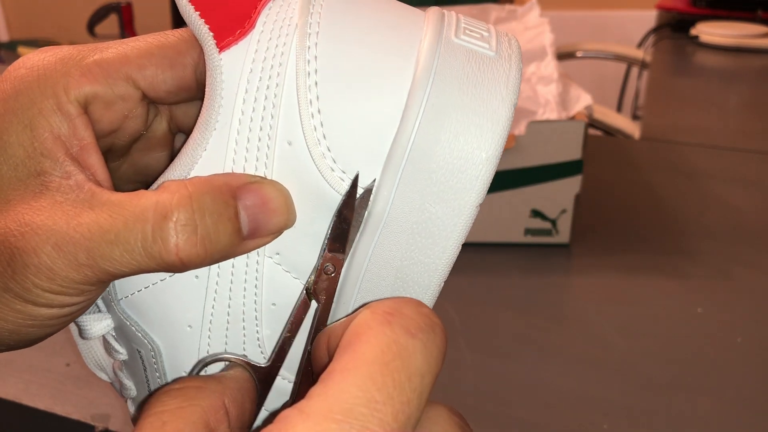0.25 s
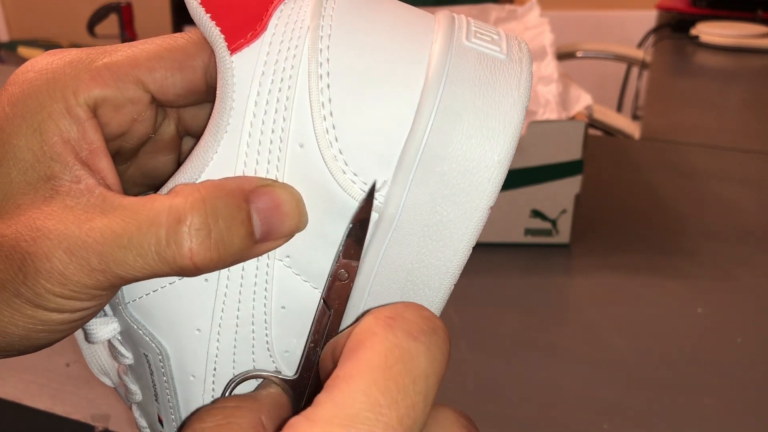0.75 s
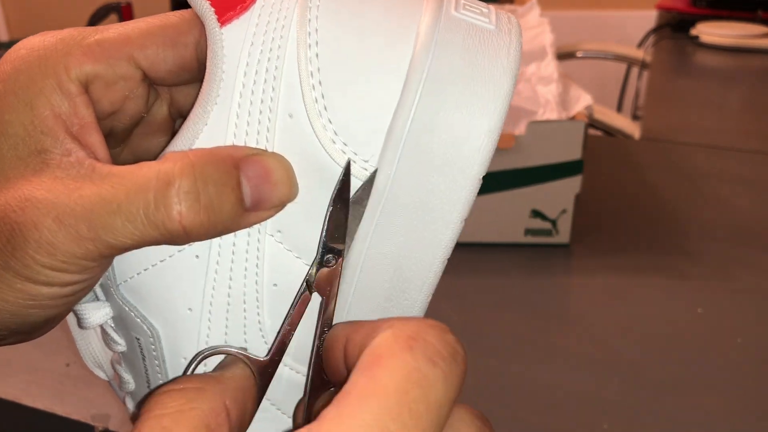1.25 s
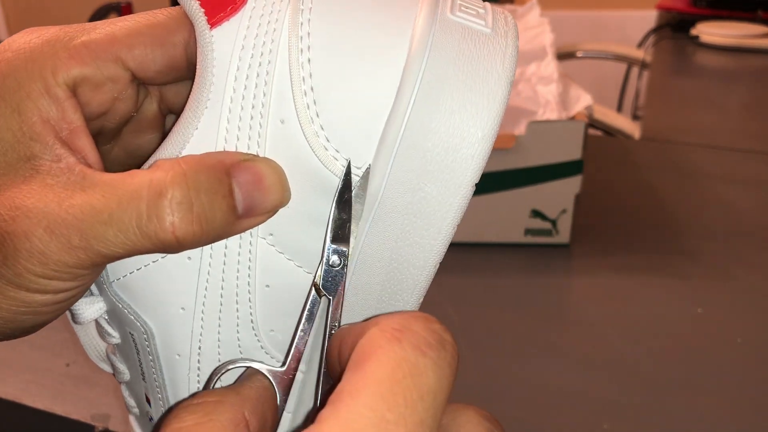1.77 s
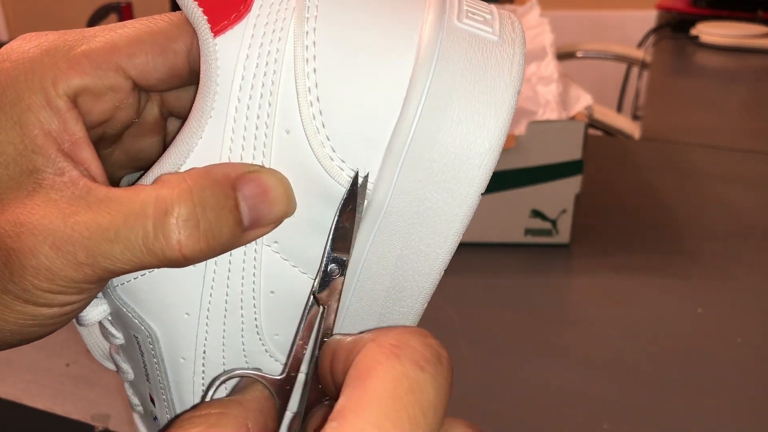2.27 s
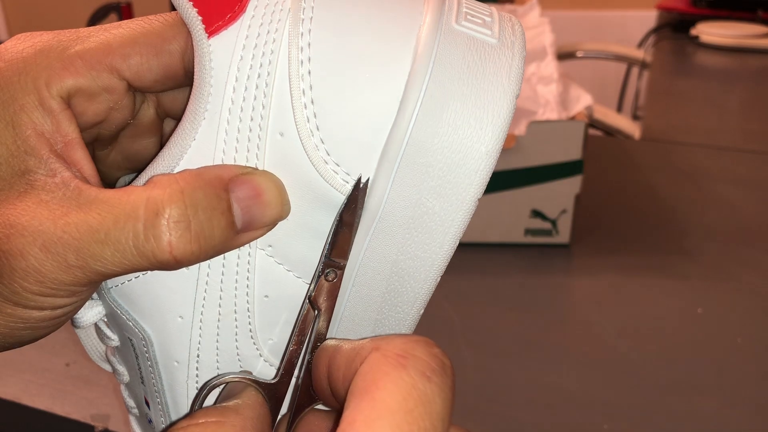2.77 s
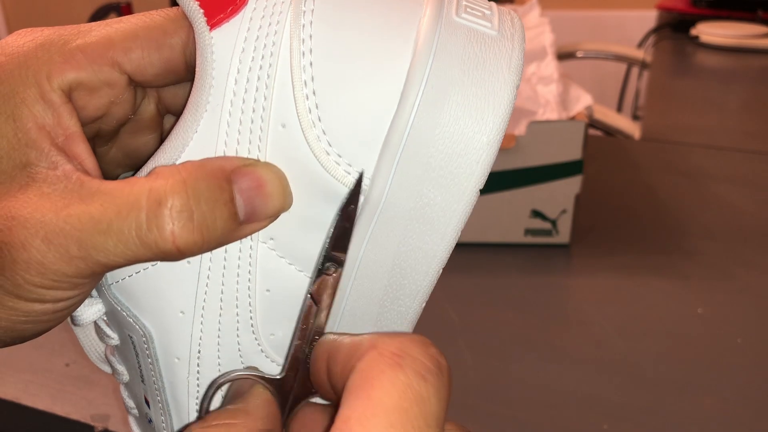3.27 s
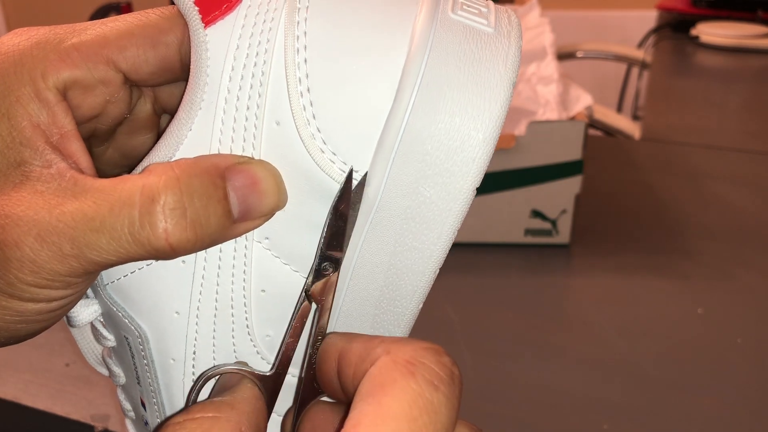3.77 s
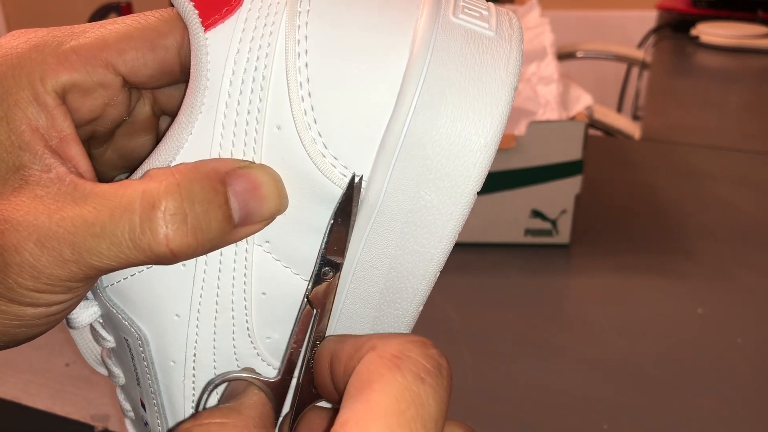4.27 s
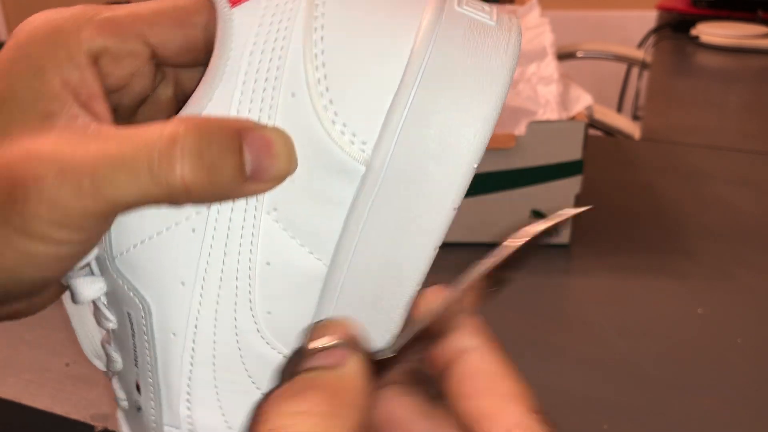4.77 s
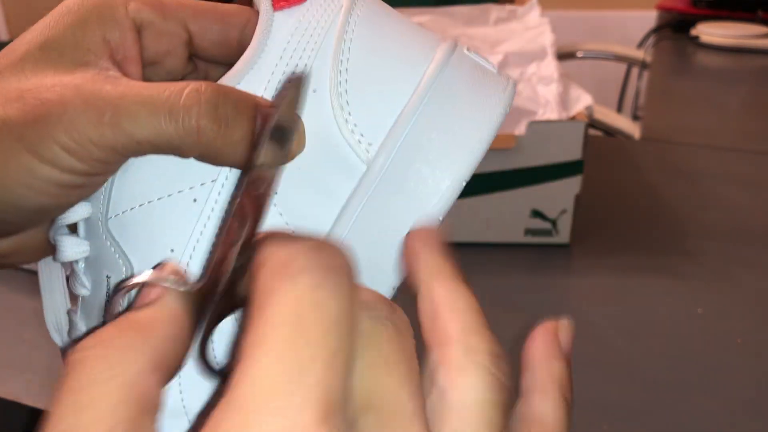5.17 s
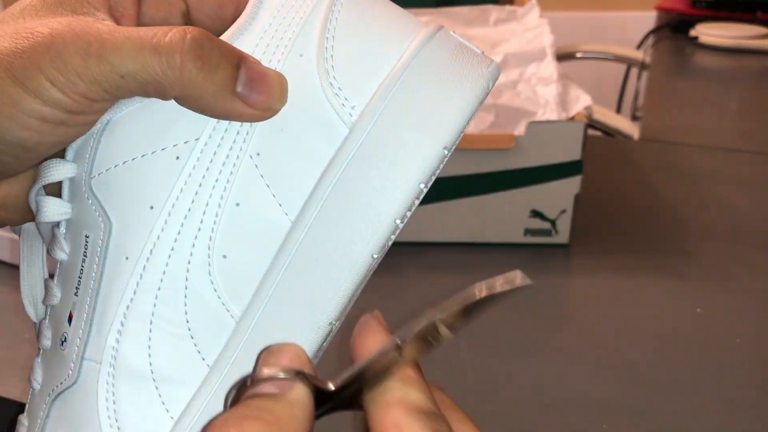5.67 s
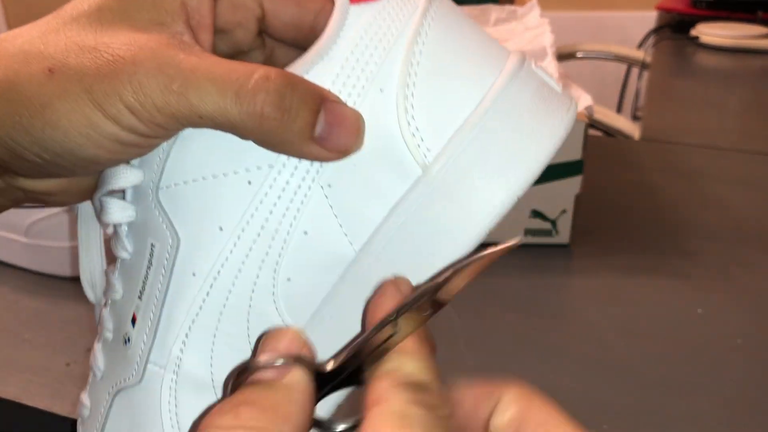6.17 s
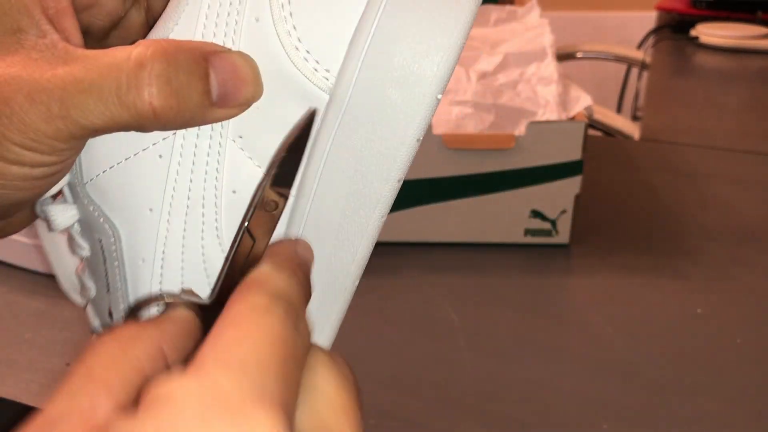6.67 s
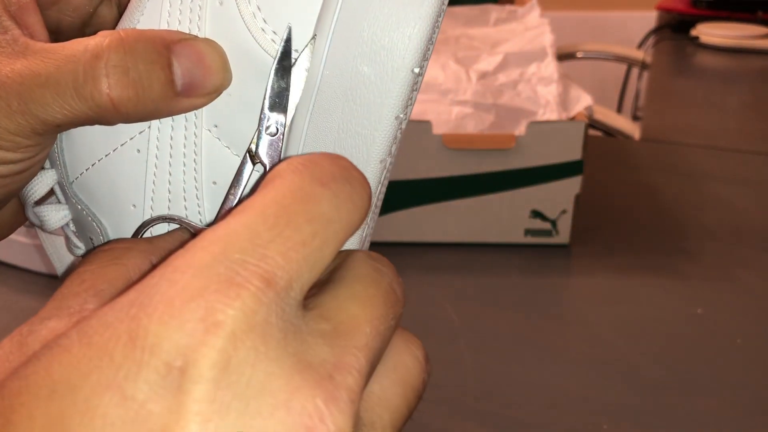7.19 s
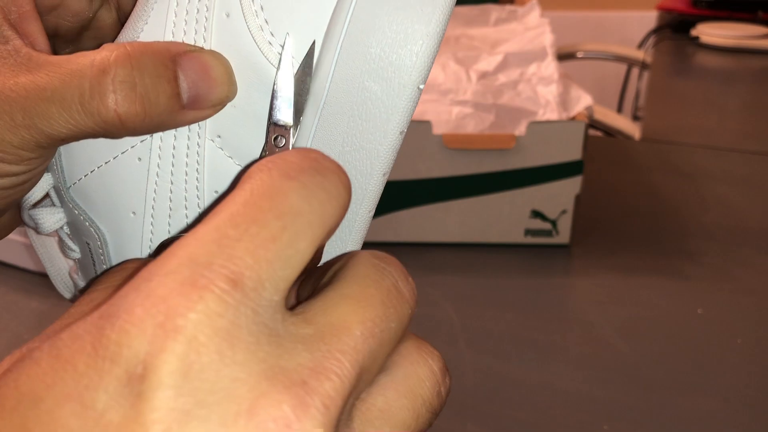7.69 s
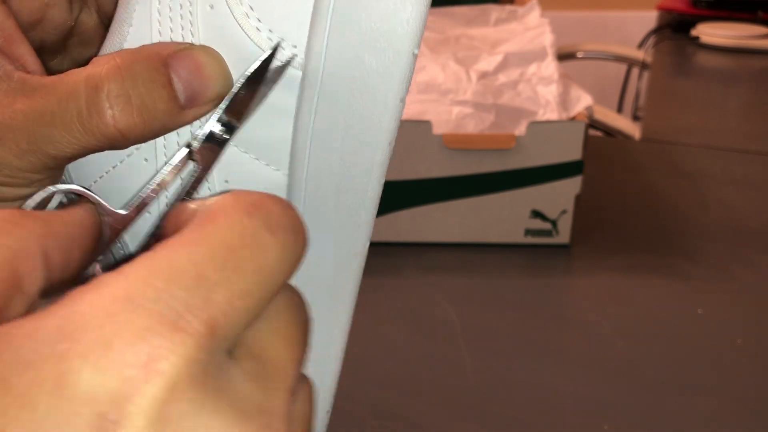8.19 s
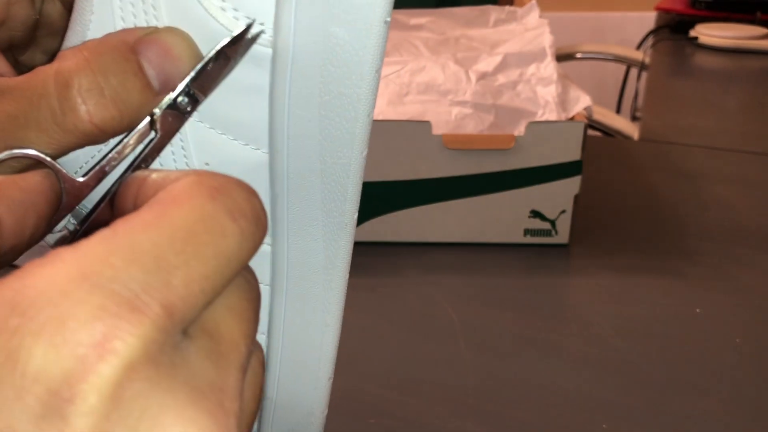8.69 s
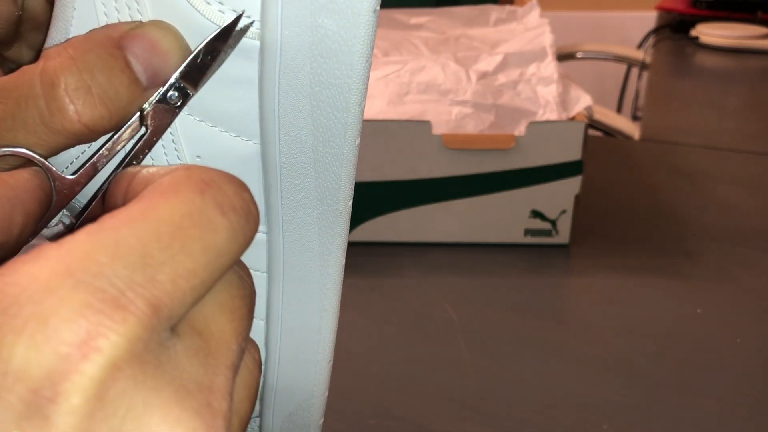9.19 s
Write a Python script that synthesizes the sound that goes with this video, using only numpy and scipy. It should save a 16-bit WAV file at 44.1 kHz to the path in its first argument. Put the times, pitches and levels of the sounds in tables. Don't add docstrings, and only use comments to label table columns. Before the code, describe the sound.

A quiet indoor room with low fan hum, air rumble and light microphone hiss. Close up, three isolated dry scissor snips come widely spaced in the first half. Then quick finger scrapes, soft taps on the shoe, faint cloth rustles and small metallic ticks cluster together, thinning to sparse dull bumps while a deep compressor hum rises and stays. Short, faint reflections follow the contacts.

```python
import sys
import numpy as np
from scipy import signal
from scipy.fft import rfft, irfft
from scipy.io import wavfile

SR = 44100
rng = np.random.default_rng(int(sys.argv[2]) if len(sys.argv) > 2 else 0)


def put_to_file(sound):
    columns = np.atleast_2d(sound).T
    safe = np.clip(columns, -1, 1)
    whole_steps = np.round(safe * 32767)
    wavfile.write(sys.argv[1], SR, whole_steps.astype(np.int16))


def undo_db(level):
    steps = np.asarray(level, float) / 20
    return 10 ** steps


N = 416304

# start_s, level_db (6 ms rms at 4 kHz), hardness_db_per_oct, focus_db_per_oct2
SNIPS = [
    (0.7234, -39.8, 3.4, -0.3),
    (3.158, -37.8, 0.8, 1.7),
    (4.4668, -42.7, 0.8, 1.8),
]
# start_s, level_db (at 4 kHz), hardness_db_per_oct, focus_db_per_oct2
KNOCKS = [
    (6.2594, -53.1, -1.9, 1.9),
    (6.2843, -50.1, 5.9, 0.2),
]
# mode_hz, level_db (over the band), t60_s
GRIPPED_MODES = [(1880, 3, .014), (2460, 3, .02), (8900, -2, .013), (14100, -1, .009)]
# mode_hz, level_db (over the band), t60_s
FREE_MODES = [(2450, 18, .009), (6379, 8, .034), (8791, 5, .022), (8952, 9, .024), (9345, 10, .02),
              (11360, -3, .018)]


def scissors():
    snips, knocks = contacts(SNIPS, column=1), contacts(KNOCKS, column=1)
    out = undo_db(-.3) * cracks(snips, trail_db=-15, trail_t60_s=.03, shear_db=-22)
    out += struck(snips, GRIPPED_MODES)
    out += cracks(knocks, trail_db=-3, trail_t60_s=.018, shear_db=-40)
    out += struck(knocks[1:], FREE_MODES)
    return out + rattle() + ticks()


# mode_hz, level_db, t60_s
RATTLE_MODES = [(2570, -0.5, 0.0079), (2920, 0, 0.0066), (5060, -5, 0.0055), (7400, 3.5, 0.0033),
                (8140, 3.5, .003), (11400, -25, 0.0071)]


def rattle():
    start_s, length_s, level_db = 6.0405, 0.0045, -54.5
    t = np.arange(N) / SR - start_s
    force = rng.standard_normal(N) * (t > 0) * (t < length_s) * undo_db(level_db)
    ringing = sum(undo_db(mode_db) * ring(force, hz, t60_s) for hz, mode_db, t60_s in RATTLE_MODES)
    return ringing + 1.3 * band(force, 2000, 14000)


# start_s, peak_db, mode_hz, t60_s
TICKS = [(.694, -58, 1940, .03), (4.8615, -53, 11700, .035), (4.862, -53, 9500, .025),
         (5.141, -35, 2600, 0.0084), (7.0035, -53, 2600, .007), (6.7766, -42.5, 2340, 0.0072),
         (7.1338, -45, 2160, 0.0075), (7.1605, -40.5, 520, 0.017), (7.947, -47, 584, 0.038),
         (8.226, -48, 2220, 0.0084), (8.658, -60, 1500, 0.018)]


def ticks():
    out = np.zeros(N)
    blow = np.zeros(4096)
    blow[0] = 1
    for start_s, peak_db, hz, t60_s in TICKS:
        swelling = ring(ring(blow, hz, t60_s), hz, t60_s / 4)
        out[round(start_s * SR):][:4096] += swelling * undo_db(peak_db) / np.abs(swelling).max()
    return out


# start_s, level_db (at 4 kHz), hardness_db_per_oct, focus_db_per_oct2
TAPS = [(4.8608, -56.6, -0.1, 2.1), (4.999, -69.4, 0.0, 0.3), (5.059, -62.4, -3.3, 2.6),
        (5.0699, -50.5, -2.9, 0.9), (5.3731, -52.4, -3.7, 0.5), (5.5981, -69.7, -4.7, 1.7),
        (5.6029, -68.7, -4.6, 2.1), (5.6563, -65.7, -5.4, 2.9), (5.6642, -56.4, -8.6, 4.2),
        (5.983, -53.6, -2.3, 0.2), (5.9939, -63.3, -6.1, 1.5), (6.359, -67.8, -4.7, 2.1),
        (6.5243, -60.6, -5.5, 2.2), (6.5557, -64.9, 0.2, 0.6), (6.6998, -63.8, -1.9, 1.6),
        (7.0031, -65.0, -6.8, 2.0), (6.7761, -65.1, -6.1, 2.6), (7.1338, -64.2, -6.3, 3.3),
        (7.161, -77.9, -5.8, -1.4), (8.226, -64.7, -5.7, 2.2)]


def taps():
    return cracks(contacts(TAPS, column=2), trail_db=-20, trail_t60_s=.025, shear_db=-45)


# touch_s, hardest_s, lift_s, scrape_db, bright_db
SWIPES = [
    (5.082, 5.111, 5.134, -58, -51.5),
    (5.104, 5.138, 5.146, -44, -48.5),
    (5.388, 5.427, 5.46, -47, -47),
    (5.998, 6.036, 6.042, -45, -48),
]


def swipes():
    strokes = strokes_of(SWIPES, low_db=-2, swing_db=[9, 18, 24], bend=[1.3, 1.3, 1.2])
    return friction(strokes, slips_per_s=8500, spread_db=3.0, tilt=.6)


# touch_s, hardest_s, lift_s, dull_db, bright_db
RUSTLES = [(2.29, 2.32, 2.35, -68, -75), (2.64, 2.68, 2.72, -72, -79), (3.128, 3.142, 3.156, -61, -67),
           (4.858, 4.862, 4.878, -64, -60), (4.865, 4.88, 4.93, -71, -69), (5.14, 5.16, 5.26, -66, -71),
           (5.45, 5.47, 5.64, -68, -70), (6.045, 6.08, 6.22, -63, -67), (6.45, 6.515, 6.545, -60, -66),
           (6.55, 6.61, 6.65, -72, -67), (6.68, 6.705, 6.76, -69, -68), (7.91, 7.935, 7.99, -72, -74)]


def rustles():
    strokes = strokes_of(RUSTLES, low_db=4, swing_db=[16.5, 11, 13], bend=[1.1, 0.92, 1.1])
    return friction(strokes, slips_per_s=4600, spread_db=2.5, tilt=0.66)


def strokes_of(rows, low_db, swing_db, bend):
    off = np.linspace(-1, 1, num=17)[:, None]
    loss_db = np.array(swing_db) * np.abs(off) ** np.where(off < 0, bend, 1.8)
    strokes = []
    for touch_s, hardest_s, lift_s, dull_db, bright_db in rows:
        times_s = np.interp(off, [-1, 0, 1], [touch_s, hardest_s, lift_s])
        levels_db = np.array([dull_db + low_db, dull_db, bright_db]) - loss_db
        strokes.append(np.c_[times_s, levels_db])
    return strokes


def friction(strokes, slips_per_s, spread_db, tilt):
    sizes = undo_db(spread_db * np.minimum(rng.exponential(1, N), 4)) * rng.choice([-1, 1], N)
    slips = sizes * (rng.random(N) < slips_per_s / SR)
    low = band(slips, 140, 1060) + 0.012 * ring(slips, 1050, 0.014)
    dull = band(slips, 1400, 3640) + .03 * ring(slips, 2540, 0.0087)
    bright = band(signal.lfilter([1], [1, -tilt], slips), 4600, 15000)
    bright = signal.sosfilt(signal.cheby2(10, 60, 16900, fs=SR, output="sos"), bright)
    parts = [rms_one(part) for part in (low, dull, bright)]
    out, t = np.zeros(N), np.arange(N) / SR
    for times_s, *levels_db in map(np.transpose, strokes):
        span = slice(round(times_s[0] * SR), round(times_s[-1] * SR))
        for level_db, part in zip(levels_db, parts):
            out[span] += undo_db(np.interp(t[span], times_s, level_db)) * part[span]
    return out


# band_hz, steel_db, leather_db, crack_t60_s
BODY = [(740, -2.4, -2.7, .02), (2000, -3.8, -3.8, .011), (3500, -5, -3.2, .006), (4800, -3, -3, .006),
        (6000, -1.5, -4.5, .005), (9700, -3.5, -4.5, .005), (11700, -3, -3, .0045),
        (15000, -7.5, -6, .0045)]


def body(column):
    edges, table = np.array(BAND_EDGES_HZ), np.array(BODY)
    middles = np.log2(np.sqrt(edges[1:] * edges[:-1]))
    return np.interp(middles, np.log2(table[:, 0]), table[:, column]), middles - np.log2(4000)


def contacts(rows, column):
    body_db, octaves = body(column)
    rows = np.array(rows)
    start_s, level_db, hardness, focus = (rows[:, i:i + 1] for i in range(4))
    return np.c_[start_s, level_db + hardness * octaves - focus * octaves ** 2 + body_db]


BAND_EDGES_HZ = [420, 740, 1300, 2000, 3000, 4100, 5500, 6500, 7600, 9000, 10500, 13000, 16000]


def cracks(rows, trail_db, trail_t60_s, shear_db):
    lead, out, rows = 160, np.zeros(N), np.array(rows)
    t = (np.arange(2048) - lead) / SR
    after = np.maximum(t, 0)
    grit = rng.standard_normal((len(rows), len(t)))
    grit[:, lead + 4] = 5.5
    crack_t60_s = body(column=3)[0]
    for k, (low_hz, high_hz) in enumerate(zip(BAND_EDGES_HZ, BAND_EDGES_HZ[1:])):
        dying = undo_db(-60 * after / crack_t60_s[k]) + undo_db(trail_db - 60 * after / trail_t60_s)
        envelope = np.where(t < 0, undo_db(shear_db + 3000 * t), dying)
        split, overlap_db = (band, 0) if low_hz < 3000 else (in_step, 2.7)
        bursts = split(grit * envelope, low_hz, high_hz)
        power = np.mean(bursts[:, lead - 20:lead + 245] ** 2, axis=1, keepdims=True)
        bursts = bursts * undo_db(rows[:, k + 1:k + 2] - overlap_db) / np.sqrt(power)
        for start_s, burst in zip(rows[:, 0], bursts):
            out[round(start_s * SR) - lead:][:len(t)] += burst
    return out


def struck(rows, modes):
    out, rows = np.zeros(N), np.array(rows)
    for hz, mode_db, t60_s in modes:
        blows = np.zeros(N)
        band_db = rows[:, np.searchsorted(BAND_EDGES_HZ, hz)]
        blows[(rows[:, 0] * SR).astype(int)] = undo_db(band_db + mode_db + 3)
        out += ring(blows, hz, t60_s)
    return out


def ring(force, hz, t60_s):
    r, w = undo_db(-60 / (t60_s * SR)), 2 * np.pi * hz / SR
    return signal.lfilter([0, np.sin(w)], [1, -2 * r * np.cos(w), r * r], force + 1e-18)


def band(x, low_hz, high_hz):
    return signal.sosfilt(signal.butter(3, [low_hz, high_hz], "band", fs=SR, output="sos"), x + 1e-18)


def in_step(x, low_hz, high_hz):
    return signal.sosfiltfilt(signal.butter(2, [low_hz, high_hz], "band", fs=SR, output="sos"), x + 1e-18)


def rms_one(x):
    return x / np.sqrt(np.mean(x ** 2) + 1e-20)


def room(x):
    t60_s, level_db, gap_s = 0.24, -19, 0.0044
    top_hz, top_t60_s, top_db = 8500, .14, -2
    t = np.arange(SR // 2) / SR
    white = rng.standard_normal(len(t))
    tail = band(white, 400, top_hz) * undo_db(-60 * t / t60_s)
    tail += band(white, top_hz, 15500) * undo_db(top_db - 60 * t / top_t60_s)
    tail *= t > gap_s
    return undo_db(level_db) * signal.fftconvolve(x, tail / np.sqrt(np.sum(tail ** 2)))[:N]


FAN_ORDERS = [1, 3, 4, 5, 7, 9, 10]
FAN_ORDERS_DB = [-80, -59.5, -58, -67.5, -65.5, -73.5, -74.5]
# time_s, loss_db
SHADE = [(0, 3), (.3, 0.5), (2.1, -1), (3.6, 1.5), (4.6, 9), (5.4, 5.5), (5.85, 0), (9.44, 1)]


def fan():
    t = np.arange(N) / SR
    shaft = 2 * np.pi * 162.33 / 6 * t
    loss_db = np.interp(t, *np.transpose(SHADE))
    flutter_db = (0.85 + 0.62 * np.maximum(loss_db, 0)) * drift(rate_hz=11)
    out = tone(6 * shaft, -51.5 - loss_db + np.minimum(flutter_db, loss_db + 2), wander_db=0)
    return out + sum(tone(k * shaft, db, wander_db=0.5) for k, db in zip(FAN_ORDERS, FAN_ORDERS_DB))


def compressor():
    pump_hz, idle_wander_db = 18.067, 4.0
    valve_hz, valve_width_hz, valve_under_third_db = 5900, 500, -29.5
    t = np.arange(N) / SR
    out, levels_db = np.zeros(N), []
    # order, idle_db, loaded_db, load_start_s, ramp_s
    for order, idle_db, loaded_db, start_s, ramp_s in [(3, -65, -49.5, 5.1, 1.9), (5, -66.5, -57.5, 4.5, 0.98)]:
        load = np.sin(np.pi / 2 * np.clip((t - start_s) / ramp_s, 0, 1))
        wander = idle_wander_db * (1 - load) * drift(4.01)
        levels_db.append(idle_db + (loaded_db - idle_db) * load + wander)
        out += tone(2 * np.pi * order * pump_hz * t, levels_db[-1], wander_db=0)
    hiss = band(rng.standard_normal(N), valve_hz - valve_width_hz / 2, valve_hz + valve_width_hz / 2)
    return out + undo_db(levels_db[0] + valve_under_third_db) * rms_one(hiss)


STEADY_HZ = [60, 120, 180, 240, 300, 79.04, 157.9, 143, 144.9, 222, 285.6]
STEADY_DB = [-72.5, -67, -67, -71.5, -77, -65, -69.5, -68, -66.5, -79, -79]


def mains():
    turn = 2 * np.pi * np.arange(N) / SR
    return sum(tone(hz * turn, db, wander_db=3.0) for hz, db in zip(STEADY_HZ, STEADY_DB))


def tone(phase, level_db, wander_db):
    return np.sqrt(2) * undo_db(level_db + wander_db * drift(1.594)) * np.sin(phase + 2 * np.pi * rng.random())


def drift(rate_hz):
    knots = rng.standard_normal(int(N / SR * 40) + 3)
    return np.interp(np.arange(N) / SR * min(rate_hz, 39), np.arange(len(knots)), knots)


# freq_hz, level_db_per_hz
RUMBLE = [(20, -105), (33, -103), (46, -91), (70, -87), (125, -85), (148, -79), (172, -87), (200, -84),
          (300, -82), (420, -90)]
# freq_hz, level_db_per_hz
HISS = [(180, -26.5), (300, 1.5), (326, -8), (354, -1.5), (412, -5.5), (440, -3), (762, -12), (900, -13),
        (1230, -19), (1640, -19.5), (2210, -22), (2700, -21.5), (8940, -27), (15000, -35), (16000, -41)]
# centre_hz, width_hz, level_db
WHINE = [(299.1, 27, -75), (387.2, 42, -73.5), (434, 29, -81.5), (587.7, 49, -73.5), (898, 65, -75.5),
         (1600, 110, -87), (2648, 120, -85)]


def air():
    out = coloured(RUMBLE) * undo_db(.8 * drift(4))
    out += undo_db(-59) * rms_one(coloured(HISS)) * undo_db(.3 * drift(3))
    for hz, width_hz, level_db in WHINE:
        whistle = rms_one(band(rng.standard_normal(N), hz - width_hz / 2, hz + width_hz / 2))
        out += undo_db(level_db + 2.7 * drift(5)) * whistle
    return out


def coloured(points):
    hz, level_db = np.transpose(points)
    grid_hz = np.maximum(np.arange(N // 2 + 1) * SR / N, 1)
    gain = undo_db(np.interp(np.log(grid_hz), np.log(hz), level_db, -160, -160))
    return irfft(rfft(rng.standard_normal(N)) * gain, N) * np.sqrt(SR / 2)


def scene():
    near = scissors() + taps() + swipes() + rustles()
    hum = fan() + compressor() + mains()
    return (near + room(near) + hum + air())[None]


def band_limit(x):
    return signal.sosfilt(signal.butter(12, 16860, fs=SR, output="sos"), x)


def record(dry):
    mix = signal.sosfilt(signal.butter(8, 16700, fs=SR, output="sos"), dry)
    return band_limit(mix)


dry = scene()
out = record(dry)
put_to_file(out)
```